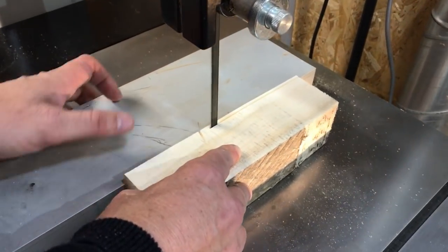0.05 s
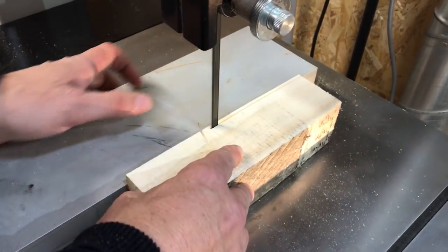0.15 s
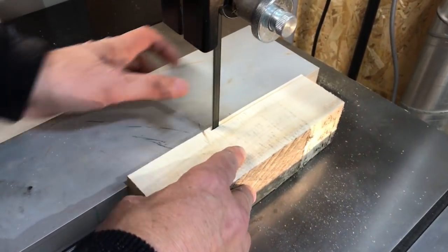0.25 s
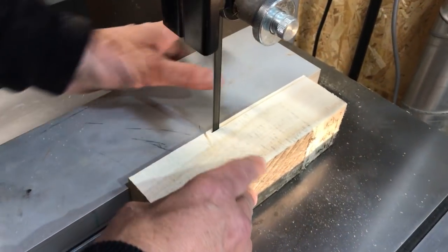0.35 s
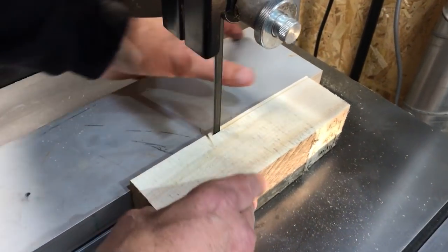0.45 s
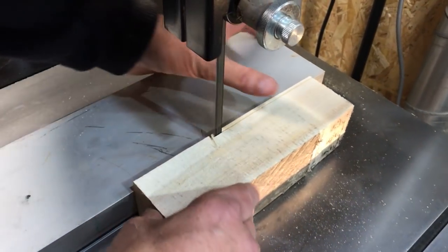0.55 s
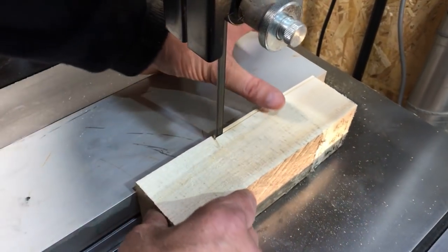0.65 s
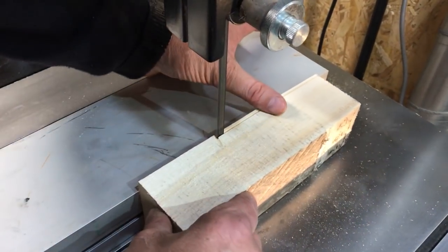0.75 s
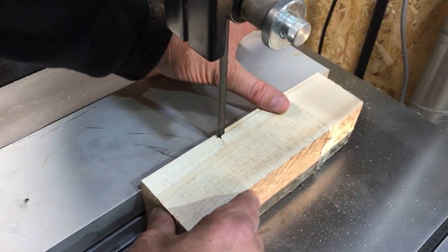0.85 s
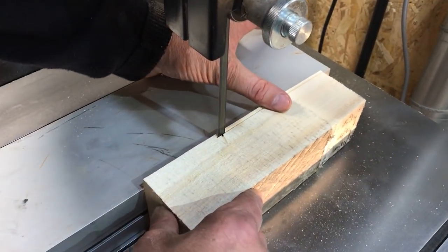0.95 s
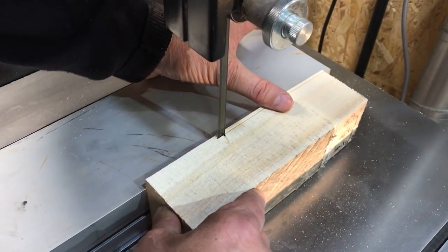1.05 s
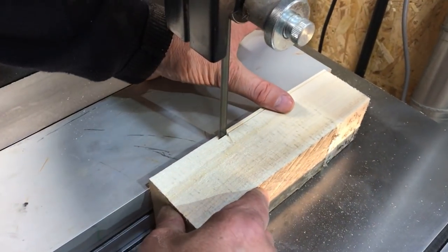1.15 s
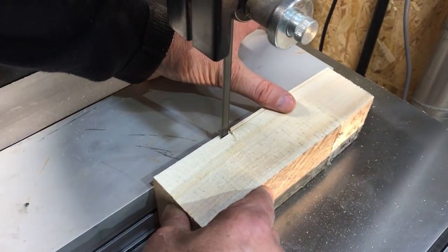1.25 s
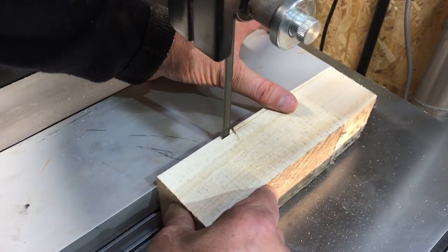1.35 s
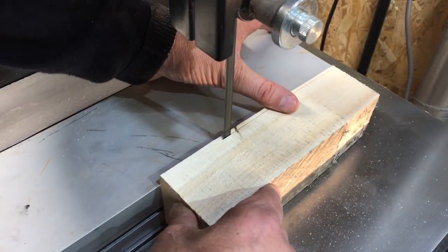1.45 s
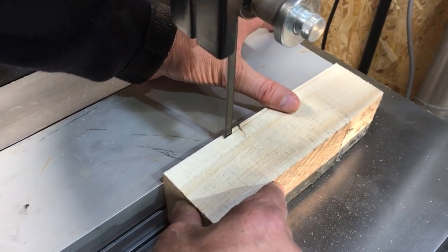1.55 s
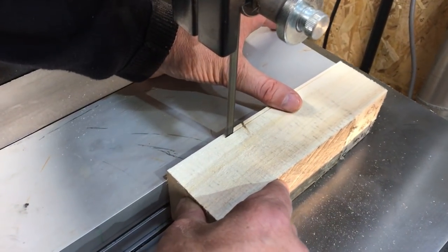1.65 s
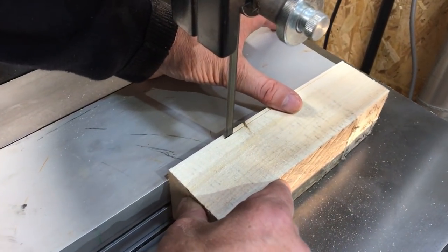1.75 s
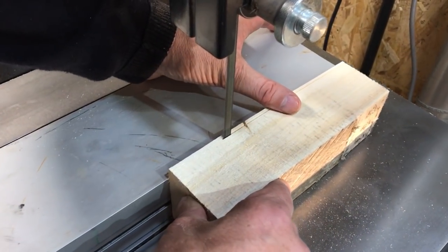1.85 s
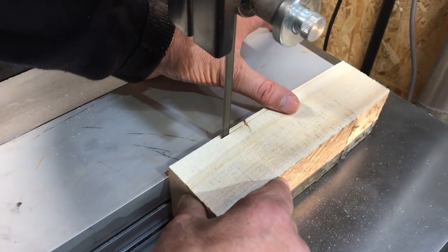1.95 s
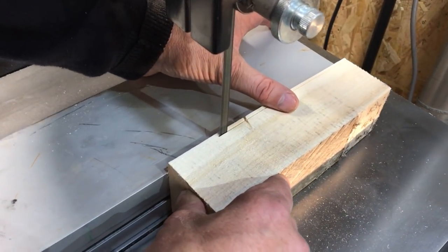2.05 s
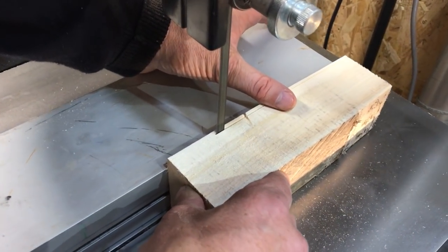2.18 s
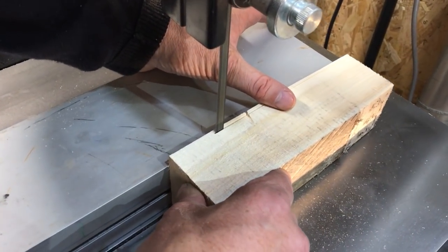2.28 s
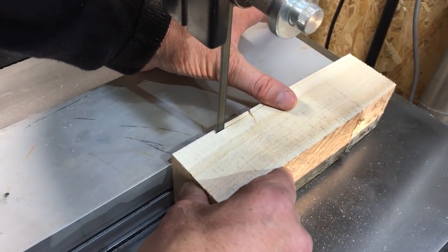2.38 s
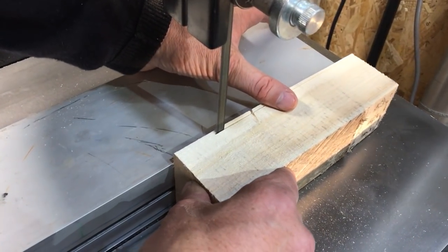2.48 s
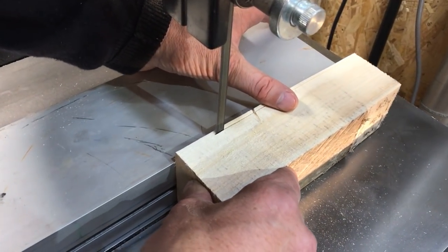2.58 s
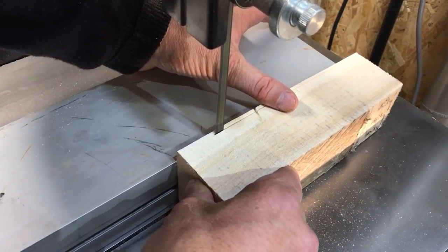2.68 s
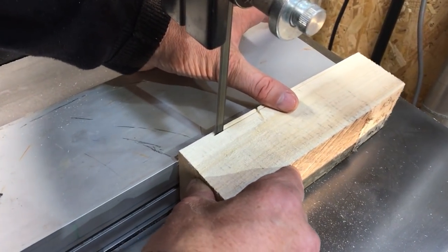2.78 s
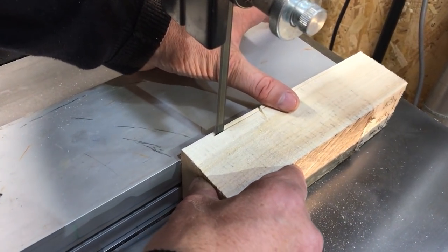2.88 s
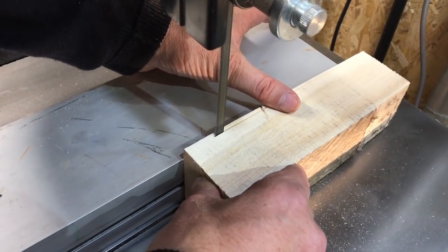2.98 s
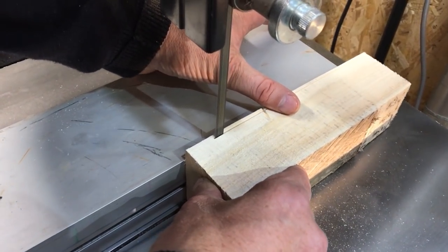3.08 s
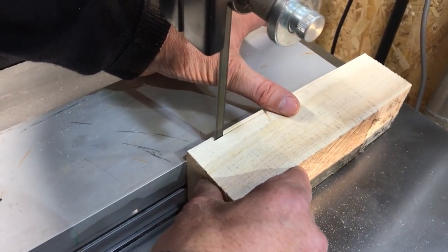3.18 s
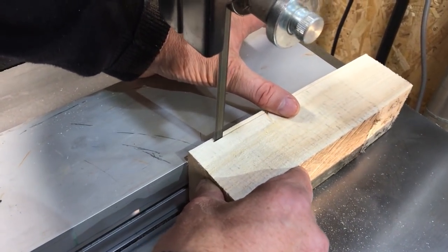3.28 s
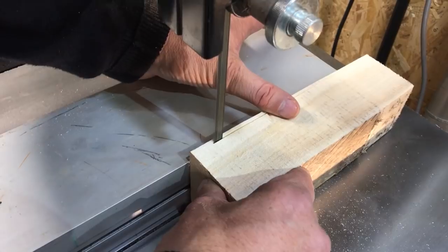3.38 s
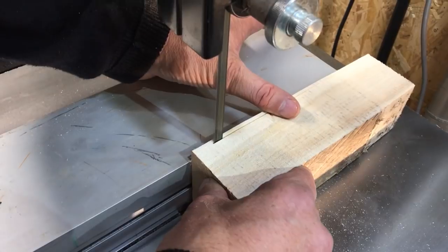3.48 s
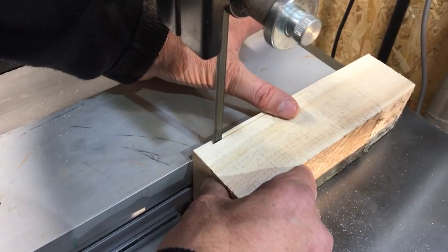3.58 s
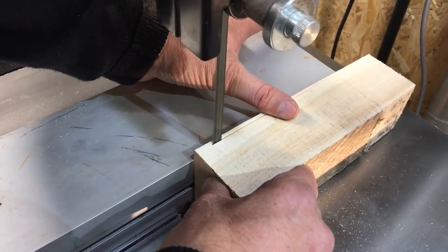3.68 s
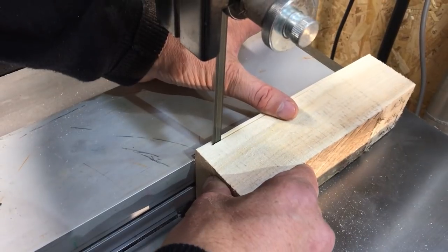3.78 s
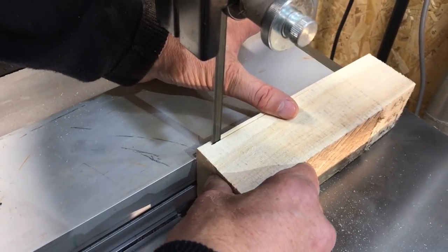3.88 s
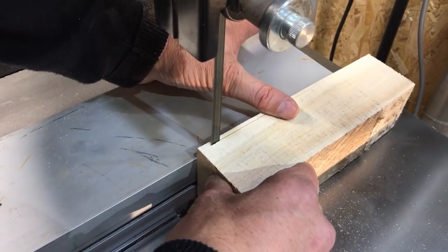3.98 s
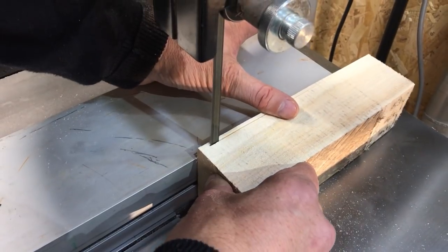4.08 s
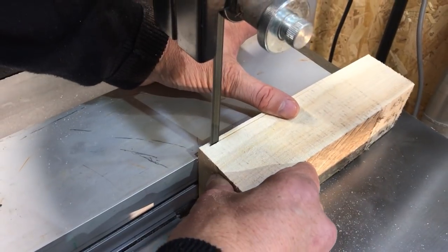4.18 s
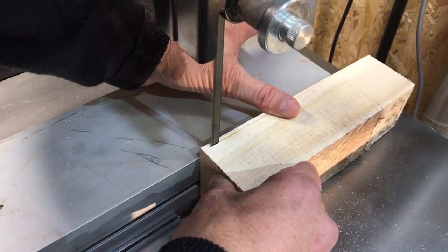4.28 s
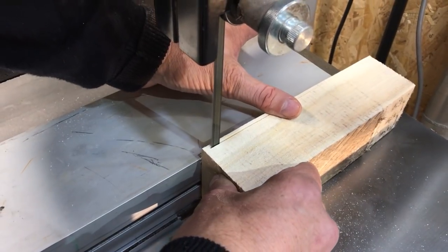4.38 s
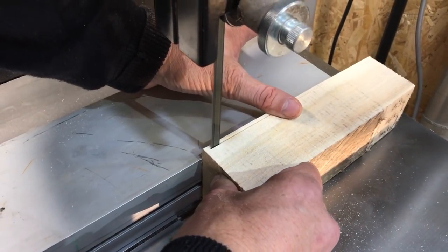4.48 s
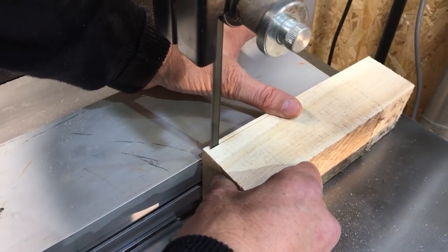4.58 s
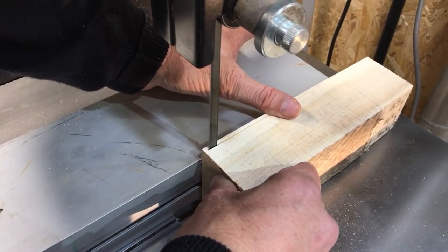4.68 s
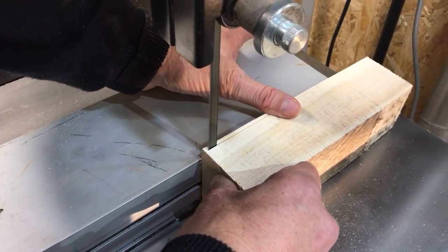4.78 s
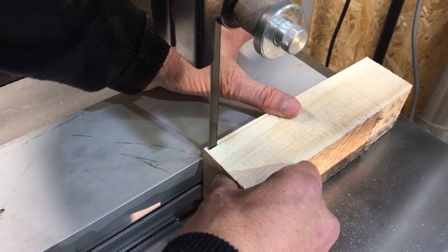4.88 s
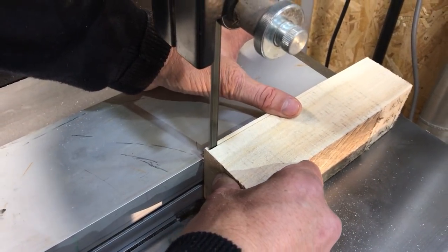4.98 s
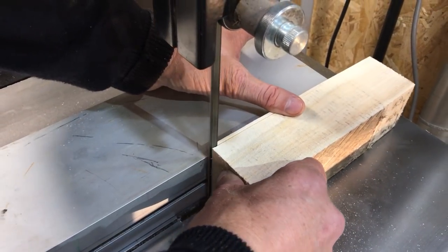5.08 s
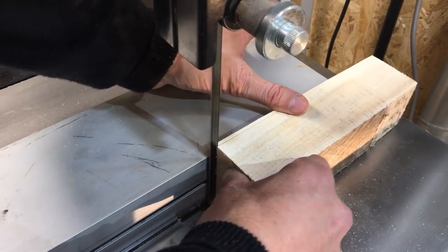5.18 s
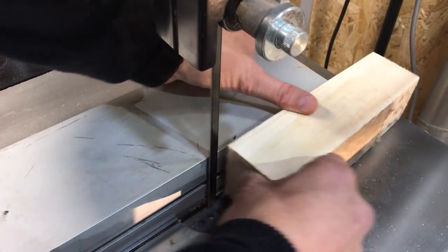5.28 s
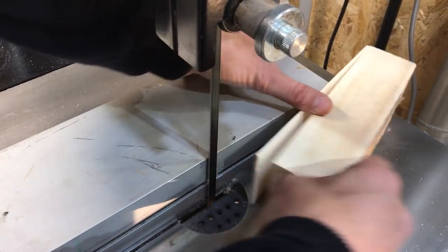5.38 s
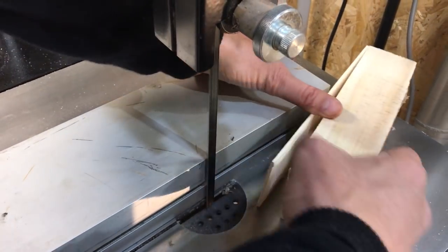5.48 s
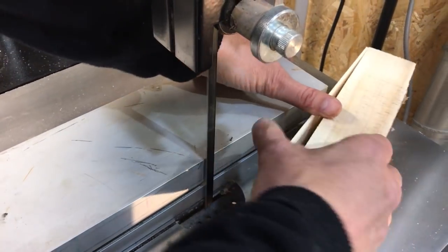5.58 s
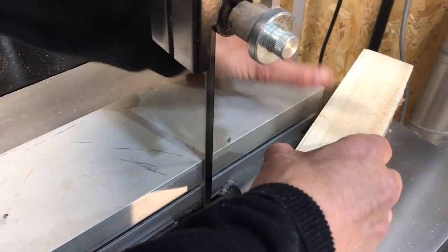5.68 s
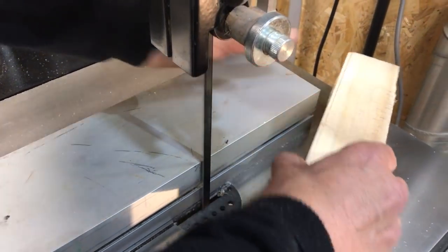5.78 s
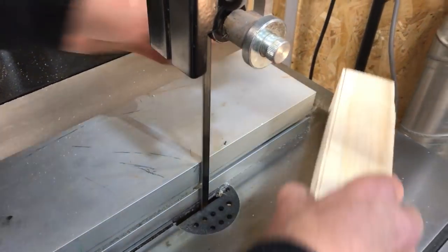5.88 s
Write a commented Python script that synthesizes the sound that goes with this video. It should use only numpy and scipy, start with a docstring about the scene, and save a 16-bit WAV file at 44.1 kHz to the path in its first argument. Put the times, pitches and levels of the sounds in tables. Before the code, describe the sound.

A bandsaw cuts a thin strip off a wooden block with a loud, harsh, pitched chatter, mixed with rasping, hissing and thin whistles from the teeth. The cut holds steady for about five seconds, ending in brief tearing and squeaks. The noise then drops, the free blade rings briefly, and the machine hums on. It is heard close up in a small workshop.

```python
"""A harsh, pitched chatter: a bandsaw rips a thin strip off a wooden block, close by in a small workshop.
The blade vibrates in the kerf at two pitches; striking the walls adds an octave and sum tones.
The teeth rasp, hiss and whistle. The last fibres tear, the free blade rings out,
and gain control lifts the hum of the idling machine. Mono."""
import sys
import numpy as np
from scipy.fft import rfft, irfft, next_fast_len
from scipy.io import wavfile
from scipy.ndimage import uniform_filter1d, minimum_filter1d, map_coordinates

SR = 44100
rng = np.random.default_rng(int(sys.argv[2]) if len(sys.argv) > 2 else 0)


def int16_out(signal):
    """Quantize to a 16-bit WAV file."""
    q = np.round(np.clip(np.atleast_2d(signal).T, -1, 1) * 32767)
    wavfile.write(sys.argv[1], SR, q.astype(np.int16))


N = 261950
TIME = np.arange(N) / SR
LOOSE_S, LET_GO_S, CUT_END_S = 4.76, 5.07, 5.182

# main blade vibration, rising as the kerf loosens its grip: t/s, f/Hz
MAIN_PITCH = [(0, 707), (.35, 730), (1.0, 711), (1.3, 719), (1.85, 709), (2.1, 722), (3.0, 716),
              (4.55, 738), (4.85, 751), (5.2, 743)]
# second, lower blade vibration: t/s, f/Hz
SECOND_PITCH = [(0, 581.2), (4.2, 586.2), (4.84, 565), (4.88, 511)]
# evenness of the vibration: t/s, clean share/0-1
EVENNESS = [(0, 0.61), (3.0, 0.23), (4.2, 0.55), (4.7, 0.76), (5.2, 0.92)]
# blade emerging from the block: t/s, share/0-1
EMERGENCE = [(0, 0), (4.0, 0.32), (4.36, 0.5), (4.47, 0.84), (5.0, 0.8)]
# main vibration flaring in hard grain: t/s, sigma/s, rise/dB
GRAIN_FLARES = [(0.087, 0.018, 6.5), (0.477, 0.09, 4.5), (0.58, 0.045, 1), (0.796, 0.031, 4.5),
                (1.553, 0.012, 8), (1.788, .025, 7), (2.218, 0.04, 1), (3.405, 0.13, 2.5),
                (3.817, 0.026, 7.5), (3.98, 0.024, 9), (4.106, 0.016, 2), (4.573, 0.039, 5),
                (4.67, 0.022, 5), (4.945, 0.025, 2)]
# hand feed pressure: t/s, chatter gain/dB
HAND_FEED = [(0, -1.5), (.25, -0.5), (1.1, -.5), (1.75, 1), (2.8, 0), (3.9, 0), (4.3, 0), (4.5, 0),
             (4.72, -3), (4.9, 0)]
def chatter():
    """Two blade vibrations strike the kerf walls, which adds octave and sum tones."""
    (main_hz,), (second_hz,) = curves(MAIN_PITCH), curves(SECOND_PITCH)
    (even,), (emerged,), (feed_db,) = curves(EVENNESS), curves(EMERGENCE), curves(HAND_FEED)
    flare_db = sum(db * swell(s, sigma_s) for s, sigma_s, db in GRAIN_FLARES)
    main = amp(flare_db) * tone_gain("main") * ring(main_hz, width_hz=39.3, clean=even)
    contact = tone_gain("second") * ring(second_hz, width_hz=13.5, clean=0.51)
    contact += tone_gain("octave") * ring(2 * main_hz, width_hz=39, clean=even + 0.066)
    contact += tone_gain("lower sum") * ring(main_hz + second_hz, width_hz=62, clean=0.13 * (1 - emerged))
    contact += tone_gain("upper sum") * ring(2 * main_hz + second_hz - 20, width_hz=44, clean=0.27)
    contact += tone_gain("guide") * ring(3035, width_hz=51, clean=0.05 + 0.14 * emerged)
    release_db = -85 * np.maximum(TIME - LET_GO_S, 0)  # the last fibres let go
    return amp(feed_db) * (amp(0.99 * release_db) * main + amp(release_db) * contact)


# stages of the cut (start, deep, breakout): t/s
STAGE_TIMES_S = [0, 3.56, 4.83]
# chatter tones by name: level/dB at start, deep, breakout, strip loose; load swing/(dB/dB)
CHATTER_TONES = { "main": (-20.5, -20.5, -23.5, -16.5, 1.5), "second": (-31.5, -35, -34.5, -36, 0.2),
                 "octave": (-21.5, -20, -18, -27, 1.1), "lower sum": (-17, -18.5, -28.5, -25, -.4),
                 "upper sum": (-25.5, -21, -27, -34, 0.2), "guide": (-28, -28, -26.5, -28.5, 1.9), }
def tone_gain(name):
    """Gain of a chatter tone: set by the stage of the cut, swung by wheel load and uneven grain."""
    *stage_db, loose_db, swing = CHATTER_TONES[name]
    gripped_db = np.interp(TIME, STAGE_TIMES_S, stage_db)
    level_db = gripped_db + looseness() * (loose_db - gripped_db)
    return amp(level_db + swing * wheel_load_db() + 1.05 * wobble(21.914))


def wheel_load_db(turn_hz=4.285, press_s=0.12):
    """The wheels press the blade into the wood once a turn, and again half a turn later."""
    angle = 2 * np.pi * turn_hz * (TIME - press_s)
    return 0.34 * np.cos(angle) + 0.96 * np.cos(2 * angle)


def looseness(ramp_s=0.051):
    """0 while the strip grips the blade, 1 once it is too thin to hold it."""
    return np.clip((TIME - LOOSE_S) / ramp_s, 0, 1)


# cutting noise: t/s, hiss level/dB, rasp level/dB
CUT_LEVELS = [(0, -21.5, -25), (1.1, -22, -24), (1.6, -22.3, -22.5), (1.77, -21, -19), (2.0, -22, -22.5),
              (3.5, -22, -22), (4.3, -24, -24.5), (4.5, -25.5, -24), (4.68, -23, -25.5), (4.74, -29, -29),
              (4.79, -22, -26.5), (5.01, -24.5, -23), (5.08, -25.5, -29.5), (5.16, -20.5, -28.5),
              (5.22, -32, -30.5)]
# chip hiss spectrum: f/Hz, relative density/dB
HISS_SPECTRUM = [(1500, -14), (3250, -1), (4200, 2), (4800, -3.5), (5900, 1), (7000, -5), (9000, -2.5),
                 (10350, -11), (11200, -3.5), (14000, -7.5), (16000, -8)]
# wood rasp spectrum: f/Hz, relative density/dB
RASP_SPECTRUM = [(25, -32), (100, -11), (200, -14.5), (320, -7.5), (480, -16.5), (650, 3), (1000, -6.5),
                 (1400, -6.5), (2000, 3.5), (2300, -2.5), (2800, 6), (3230, -8.5), (3600, -5), (5000, -6),
                 (12000, -14.5)]
# block and table modes: f/Hz, width/Hz, gain/dB deep in the cut, gain/dB fully emerged
BLOCK_MODES = [(388.5, 46, -17, -8), (517.5, 15, -15.5, -29), (818, 95, -22, -4), (891, 70, -15, -2),
               (1033, 62, -39, -6), (1131, 24, -23.5, 0.5), (1656, 27, -18, -26), (1752, 16.5, -6.5, -5.5),
               (1874, 260, -7, -2), (2472, 7.1, -9.5, -14), (2570, 25, -20, -23), (3675, 126, -9.5, -7.5)]
# blade speed, rising as the load eases: t/s, tooth rate/Hz
TOOTH_RATE = [(0, 2274), (2.6, 2273), (3.8, 2279), (5.2, 2291)]
def cutting():
    """Each tooth tears out a chip: pulsed hiss, rasp, and the block ringing and droning on the table."""
    (hiss_db, rasp_db), (tooth_hz,), (emerged,) = curves(CUT_LEVELS), curves(TOOTH_RATE), curves(EMERGENCE)
    bite = 1 + 0.18 * np.cos(2 * np.pi * np.cumsum(tooth_hz) / SR)
    load_db = 0.57 * wheel_load_db() + 1.1 * wobble(50)  # wheels and grain
    chips = unit(bite * amp(2 * wobble(1400)) * noise(HISS_SPECTRUM))
    hiss = amp(hiss_db + load_db + 0.05) * chips
    rasp = amp(rasp_db + load_db + 3 - emerged) * noise(RASP_SPECTRUM)
    modes = sum(amp(deep_db + emerged * (out_db - deep_db)) * ring(hz, width_hz)
                for hz, width_hz, deep_db, out_db in BLOCK_MODES)
    drone = amp(-40 - 2 * TIME) * ring(230, width_hz=16)
    return reflections(hiss + rasp) + amp(rasp_db) * modes + drone


# tooth-set whistle: multiple of the three-tooth rate, level/dB re hiss
SET_PARTIALS = [(11, -26), (13, -32), (14, -28), (16, -25), (17, -25), (19, -25)]
def set_whistle():
    """The left-right-straight set of the teeth whistles at multiples of a third of the tooth rate."""
    (hiss_db, _), (tooth_hz,) = curves(CUT_LEVELS), curves(TOOTH_RATE)
    whistle = sum(amp(db + 2 * wobble(4)) * ring(multiple * tooth_hz / 3, width_hz=34, clean=0.35)
                  for multiple, db in SET_PARTIALS)
    brush_db = 8 * swell(5.145, sigma_s=0.035)  # teeth brush the last splinter
    return amp(hiss_db + brush_db) * whistle


# tooth-rate overtones: multiple, level/dB at start, deep, breakout
TOOTH_PARTIALS = [(2, -46, -35, -37), (3, -43, -36, -42), (4, -39, -34.5, -43), (5, -37, -41, -44),
                  (6, -40, -42, -48)]
# brief shrieks on one overtone: t/s, sigma/s, multiple, peak/dB
TOOTH_SHRIEKS = [(1.1, .2, 5, -31), (1.1, .2, 6, -38), (2.2, .15, 4, -35), (3.65, .28, 4, -33),
                 (3.78, .12, 5, -35)]
def tooth_shrill():
    """The passing teeth sound overtones of their rate, weaker once the strip is loose."""
    (tooth_hz,) = curves(TOOTH_RATE)
    shrill = 0
    for multiple, *stage_db in TOOTH_PARTIALS:
        held = amp(np.interp(TIME, STAGE_TIMES_S, stage_db) + wobble(3.76) - 6.5 * looseness())
        shriek = sum(amp(db) * swell(s, sigma_s) for s, sigma_s, k, db in TOOTH_SHRIEKS if k == multiple)
        shrill += np.hypot(held, shriek) * ring(multiple * tooth_hz, width_hz=27, clean=0.74)
    return shrill


# teeth catching: t/s, peak/dB
GRAIN_CATCHES = [(.1, -28), (.62, -25.5), (.755, -23), (1.77, -24.5), (2.73, -19.5), (3.518, -20.5),
                 (4.48, -25)]
def catching():
    """Teeth catch in hard grain and throw the blade sideways, exciting its lower vibration."""
    (second_hz,) = curves(SECOND_PITCH)
    return bursts(GRAIN_CATCHES, sigma_s=0.022) * ring(second_hz, width_hz=150, clean=0.83)


# last fibres tearing: t/s, relative peak/dB
FIBRE_TEARS = [(4.7785, -7), (4.8294, -6), (4.8894, -2.5), (4.9444, -3), (5.01, 2.5), (5.0494, -12),
               (5.0988, -6), (5.1557, -5)]
def tearing():
    """The thin end of the strip flutters into the teeth in short bursts."""
    rough_hiss = unit(amp(1.9 * wobble(900)) * noise(HISS_SPECTRUM))
    return amp(-17.5) * bursts(FIBRE_TEARS, sigma_s=0.012) * rough_hiss


# blade rubbing the guide: t/s, peak/dB
GUIDE_SQUEALS = [(4.793, -25), (4.92, -19), (5.108, -21.5)]
def squealing():
    """The loose blade squeals against its guide."""
    return bursts(GUIDE_SQUEALS, sigma_s=0.011) * ring(3035, width_hz=30, clean=0.65)


# free blade modes: f/Hz, width/Hz, running level/dB, ring-out level/dB
BLADE_MODES = [(750, 3.5, -48.5, -41.5), (762, 11, -49, -35), (811, 3.5, -61, -30), (1406, 15, -51.5, -60),
               (3080, 20, -53, -59.5), (3890, 130, -54, -54), (6800, 160, -54, -68), (7090, 69, -72, -70),
               (9450, 500, -61, -68.5)]
def free_blade(rise_s=0.21, t60_s=1.45):
    """The running blade rings faintly throughout; its modes swell as the cut ends, then ring out."""
    since_s = TIME - CUT_END_S
    ring_out = np.clip(1 + since_s / rise_s, 0, 1) * after_cut(t60_s)
    return sum((amp(run_db) + amp(ring_db) * ring_out) * ring(hz, width_hz, clean=0.83 * (width_hz < 10))
               for hz, width_hz, run_db, ring_db in BLADE_MODES)


# motor and wheel tones: f/Hz, level/dB
MOTOR_TONES = [(90, -58), (112, -51.5), (188, -50.5), (200, -59), (222, -69), (246, -49), (300, -57.5),
               (370, -55), (403, -49)]
# running band spectrum: f/Hz, relative density/dB
BAND_SPECTRUM = [(25, -40), (55, -11), (100, -22), (140, -7.5), (188, -4), (267, -9.5), (400, -5),
                 (480, -13.5), (800, -7.5), (1050, -9), (2500, -15), (6400, -17.5), (8000, -25.5),
                 (15500, -28.5)]
def machine():
    """Motor and wheels hum under the rush of the running band."""
    hum = sum(amp(db) * ring(hz, width_hz=2.7, clean=0.63) for hz, db in MOTOR_TONES)
    rush = amp(-37 + 0.24 * wobble(25)) * reflections(noise(BAND_SPECTRUM))
    return hum + rush


# chip impact: t/s, peak/dB
CHIP_TICKS = [(5.757, -43)]
def chip_tick():
    """A stray chip flicks against the running teeth."""
    flick = sum(amp(db) * np.exp(-np.abs(TIME - s) / 0.0033) for s, db in CHIP_TICKS)
    return flick * noise([(3000, -25), (8000, 2), (12000, 5.5), (16000, -4.5)])


# echoes off table, fence and guard: delay/s, linear gain
NEAR_ECHOES = [(.0029, -.11), (.0047, .1), (.0083, .1), (.0126, -.09)]
def reflections(x):
    """Close hard surfaces comb the spectrum with their echoes."""
    return filtered(x, lambda hz: 1 + sum(gain * np.exp(-2j * np.pi * hz * s) for s, gain in NEAR_ECHOES))


def amp(db):
    return 10 ** (np.asarray(db) / 20)


def unit(x):
    """Scale to rms 1."""
    return x / np.sqrt(np.mean(np.abs(x) ** 2) + 1e-20)


def curves(rows):
    """Per-sample values of each column after t/s."""
    times_s, *columns = np.transpose(rows)
    return [np.interp(TIME, times_s, column) for column in columns]


def swell(centre_s, sigma_s):
    """Gaussian of height 1."""
    return np.exp(-0.5 * ((TIME - centre_s) / sigma_s) ** 2)


def bursts(rows, sigma_s):
    """Envelope of swells from rows of t/s, peak/dB."""
    return sum(amp(db) * swell(s, sigma_s) for s, db in rows)


def after_cut(t60_s):
    """Gain of 1 until the cut ends, then exponential decay."""
    return amp(-60 * np.maximum(TIME - CUT_END_S, 0) / t60_s)


def wobble(knots_per_s):
    """Smooth random curve, rms 1."""
    knots = rng.standard_normal(int(N * knots_per_s / SR) + 4)
    return unit(map_coordinates(knots, [TIME * knots_per_s]))


def filtered(x, response):
    """Apply a frequency response, a function of f/Hz."""
    size = next_fast_len(N + 8192)
    return irfft(rfft(x, size) * response(np.fft.rfftfreq(size, 1 / SR)), size)[:N]


def noise(spectrum):
    """Noise of rms 1, coloured by rows of f/Hz, level/dB."""
    points_hz, db = np.transpose(spectrum)
    white = rng.standard_normal(N)
    return unit(filtered(white, lambda hz: amp(np.interp(np.log(hz + 1), np.log(points_hz), db))))


def ring(hz, width_hz, clean=0):
    """Vibration of rms 1: a clean share of the power, the rest wandering in size and phase."""
    size = 16384
    offset_hz = np.fft.fftfreq(size, N / SR / size)
    shape = 1 / np.sqrt((1 + (2 * offset_hz / width_hz) ** 2) * (1 + (offset_hz / width_hz / 2) ** 2))
    white = rng.standard_normal(size) + 1j * rng.standard_normal(size)
    wander = unit(np.fft.ifft(shape * white))
    wander = np.interp(np.arange(N) * size / N, np.arange(size), wander)
    phase = 2 * np.pi * (np.cumsum(hz * np.ones(N)) / SR + rng.random())
    narrowband = wander.real * np.cos(phase) - wander.imag * np.sin(phase)
    return np.sqrt(2) * (np.sqrt(clean) * np.cos(phase) + np.sqrt(1 - clean) * narrowband)


def scene():
    """The cut stops as the blade leaves the wood; the machine runs on."""
    cut = chatter() + squealing() + catching() + cutting() + set_whistle() + tooth_shrill() + tearing()
    mono = after_cut(t60_s=0.18) * cut + machine() + free_blade() + chip_tick()
    return np.array([mono, mono])


def gain_control(x, target_db, max_gain_db, release_db_per_s, hold_s):
    """Loud sound pushes the gain down at once; it creeps back up after a short hold."""
    level_db = 10 * np.log10(np.abs(uniform_filter1d(x ** 2, size=1300)) + 1e-9)
    wanted_db = np.minimum(target_db - level_db, max_gain_db)
    hold_samples = int(hold_s * SR) | 1
    held_db = minimum_filter1d(wanted_db, hold_samples, origin=hold_samples // 2)
    release_db = release_db_per_s * TIME
    gain_db = np.minimum.accumulate(held_db - release_db) + release_db
    return x * amp(uniform_filter1d(gain_db, size=400))


def record(dry):
    """Gain control, rounded peaks and a band limit, alike on both channels."""
    x = gain_control(dry[0], target_db=-10, max_gain_db=11, release_db_per_s=15, hold_s=0.1)
    x = x / (1 + np.abs(x / 0.78) ** 8) ** (1 / 8)
    x = filtered(x, lambda hz: hz < 15760)
    return np.array([x, x])


dry = scene()
out = record(dry)
int16_out(out)
```